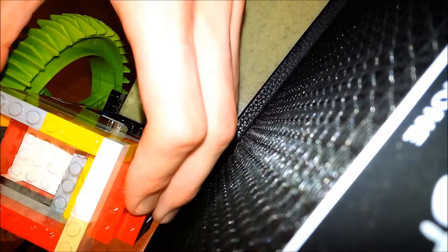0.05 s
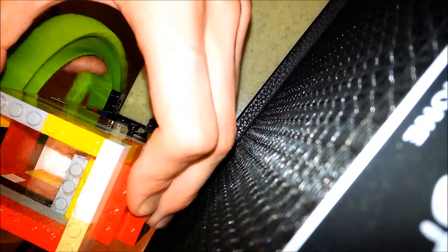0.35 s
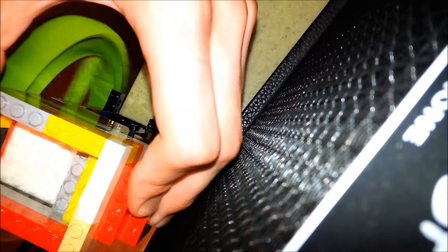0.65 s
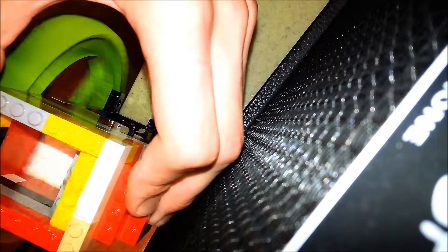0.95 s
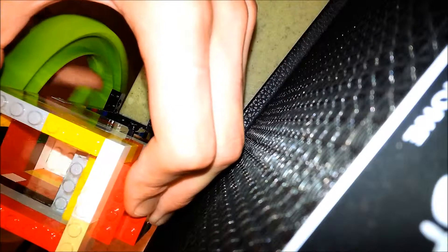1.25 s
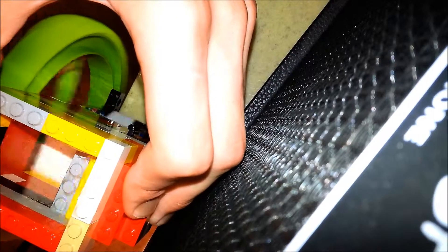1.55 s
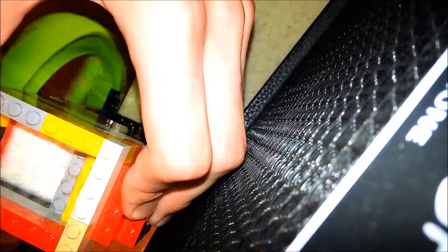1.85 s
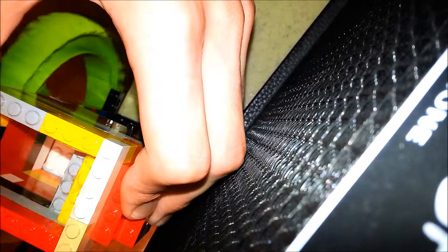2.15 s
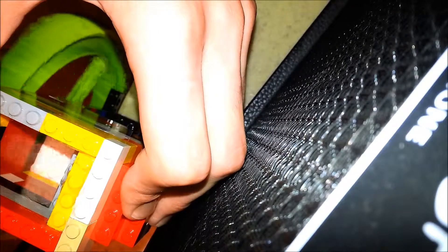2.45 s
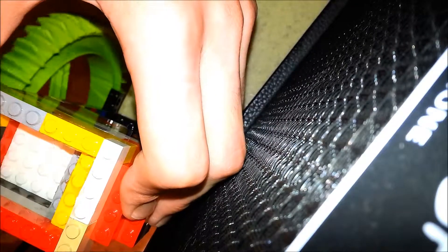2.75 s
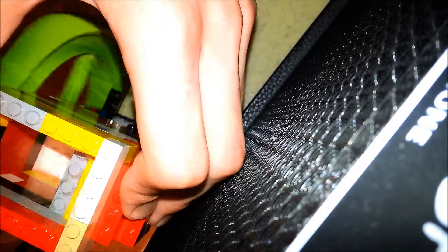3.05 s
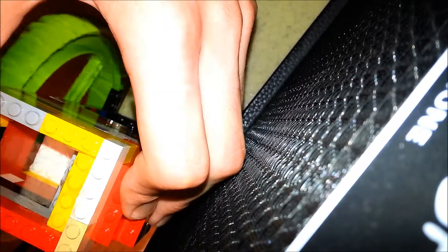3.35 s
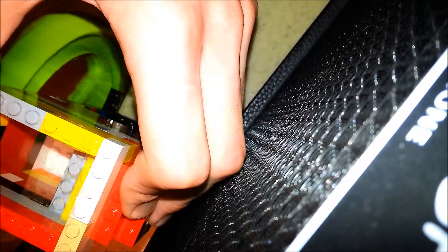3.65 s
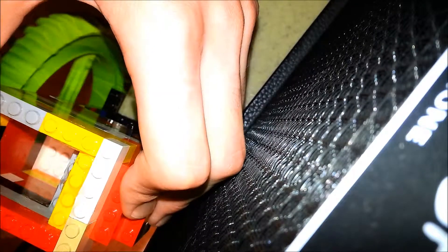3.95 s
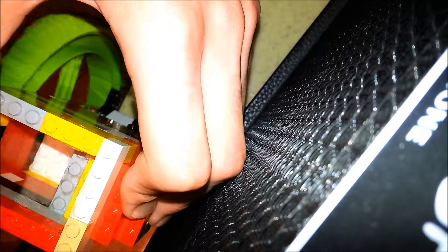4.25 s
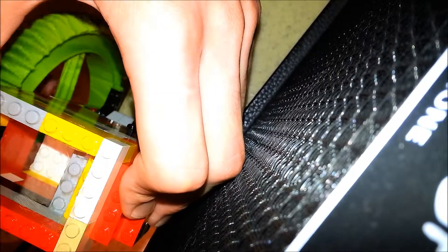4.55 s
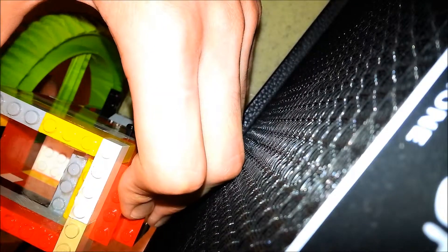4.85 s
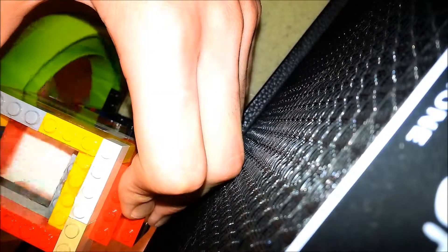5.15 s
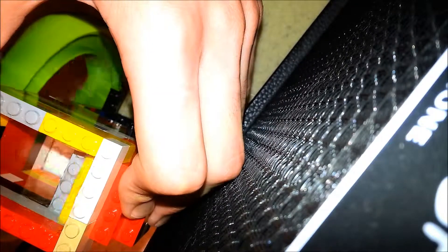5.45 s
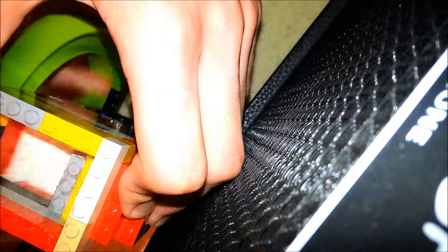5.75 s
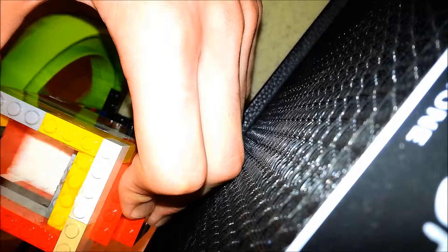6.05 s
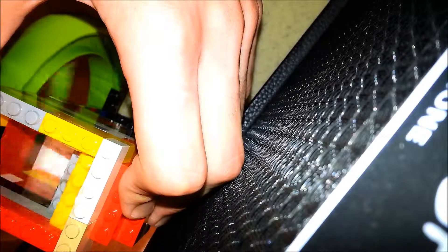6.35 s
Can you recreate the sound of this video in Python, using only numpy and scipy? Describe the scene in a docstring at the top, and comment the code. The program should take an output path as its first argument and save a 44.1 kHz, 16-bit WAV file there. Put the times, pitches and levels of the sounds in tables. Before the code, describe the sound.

A toy piston engine built of plastic bricks is turned by hand in a few uneven spins. Each stroke gives a sharp click and an immediate clack, with a slight hollow ring from the frame. Between strokes the parts rub, scrape and rattle softly. The clacking pauses twice and resumes. It is heard close up in a small, quiet room, with a faint electric buzz on the left.

```python
"""Toy piston engine

An engine of plastic bricks is turned by its wheel in a few spins, close up in a small room.
On each stroke the slack linkage clicks, the piston clacks home and the hollow frame drones.
Between strokes the parts rub, catch, rattle and bump; frame and room ring on.
A faint electric buzz sits in the left channel over quiet room air."""
import sys
import numpy as np
from scipy import signal
from scipy.fft import rfft, irfft, next_fast_len
from scipy.io import wavfile
from scipy.ndimage import uniform_filter1d, map_coordinates

SR = 44100
rng = np.random.default_rng(int(sys.argv[2]) if len(sys.argv) > 2 else 0)


def transcribe(signal):
    """Save signal, clipped to [-1, 1], as a 16-bit WAV file at the path in sys.argv[1]."""
    frames = np.atleast_2d(signal).T
    limited = np.clip(frames, -1, 1)
    pcm = np.round(limited * 32767).astype(np.int16)
    wavfile.write(sys.argv[1], SR, pcm)


N = 282681
TIME = np.arange(N) / SR
AGE = np.arange(SR // 2) / SR  # seconds since a blow
ATTACK, EARLY = 132, 1320  # samples in the first 3 ms and 30 ms of a hit
FRAME_PAN_DB = [[1], [-1]]  # the frame sounds a little to the left

# engine strokes: click t/s, click level/dB, its crack level/dB, clack t/s, clack level/dB, drone level/dB
STROKES = [(0.3954, -18.5, -42, 0.4546, -24.5, -39), (0.902, -13.5, -32.5, 0.9364, -16.5, -46),
           (1.3238, -11.5, -27, 1.3574, -13, -40), (1.6926, -16, -18, 1.7168, -15.5, -54),
           (2.0633, -20.5, -36.5, 2.1026, -24.5, -49), (3.1676, -16.5, -31.5, 3.1935, -12, -40),
           (3.7238, -15, -20.5, 3.7487, -12.5, -46), (4.1991, -15.5, -39, 4.2345, -27, -45),
           (4.3667, -20, -39.5, 4.4116, -28.5, -50.5), (5.5015, -14, -33, 5.5345, -12, -41),
           (5.953, -13.5, -36, 5.9894, -11, -39.5), (6.3655, -18, -41, 6.4033, -10.5, -41)]
# bright spectrum of cracks, grit and hiss: f/Hz, level/dB
BRIGHT = [(500, -44), (2500, 1.5), (4500, 2.5), (6000, 5.5), (8000, 4), (11000, -5), (14500, -9)]


def piston():
    """The piston grazes its guide and clacks home; the harder the knock, the brighter its crack."""
    # piston modes: f/Hz, level/dB, t60/s
    modes = [(430, -22, 0.019), (994, -5.5, 0.01), (1348, 2, 0.019), (1844, -6, 0.011),
             (3090, -12.5, 0.011), (3790, -19, 0.022)]
    crack_growth, graze_lead_s, graze_db = 1.45, 0.00119, -17.5
    clacks = [(s, db, crack_growth * db - 9.5, 1) for *_, s, db, _ in STROKES]
    out = blows(clacks, modes, contact_s=0.00057, tail_db=-14, frame_db=-9, wall_db=4, shade_db=-12.5)
    for s, db, _, _ in clacks:
        graze = direct(struck(modes, contact_s=0.00036), shade_db=-11.5)
        add(out, s - graze_lead_s, amp(db + graze_db) * graze)
    return out


def linkage():
    """The linkage takes up its slack at the start of each stroke, and rattles in between."""
    # linkage modes: f/Hz, level/dB, t60/s
    modes = [(455, -13.5, 0.017), (1026, -10.5, 0.017), (1583, 8.5, 0.013), (1833, 7.5, 0.013),
             (2180, 3, 0.0057), (3310, 1, 0.0066)]
    # rattles in the linkage's play: t/s, level/dB, crack level/dB, pitch factor
    rattles = [(0.7166, -31.5, -57, 1.03), (0.766, -31.5, -52, 1.02), (1.1375, -32.5, -56, 1.02),
               (1.1563, -28.5, -61, 1.12), (1.1801, -25.5, -55, 1.07), (1.5549, -28.5, -60, 1.08),
               (1.5792, -21.5, -32, 1.15), (1.9517, -18, -28, 1.125), (1.9678, -23.5, -37, 1.08),
               (2.7334, -29, -57, 0.95), (4.2641, -25.5, -58, 1.1), (4.6326, -32, -40, 1.03),
               (5.2963, -28.5, -44, 0.98), (5.3345, -22, -61, 1.006), (5.7739, -26, -43, 0.97),
               (5.82, -25.5, -53, 1.1), (6.2092, -26.5, -42.5, 1.02), (6.2492, -18, -40, 1.04)]
    clicks = [(s, db, crack_db, 1) for s, db, crack_db, *_ in STROKES]
    taut = blows(clicks, modes, contact_s=0.0005, tail_db=-12.5, frame_db=-12, wall_db=-1.5,
                 shade_db=-10.5)
    slack = blows(rattles, modes, contact_s=0.00048, tail_db=-11, frame_db=-10.5, wall_db=-3,
                  shade_db=-10)
    return taut + slack


def blows(hits, modes, contact_s, tail_db, frame_db, wall_db, shade_db):
    """Each hit cracks and rings its part briefly, then the frame and the room in proportion."""
    # long modes of the hollow frame and the space round it: f/Hz, level/dB, t60/s
    frame_modes = [(327, -7, .35), (1343, 2, .24), (1585, -4, .2), (1780, -5, .2), (1915, -3, .2),
                   (2929, -11, .25), (3373, -5, .25), (3553, -9, .2), (3680, -6, .2)]
    # colour of the room tail: f/Hz, level/dB
    room_colour = [(50, -46), (130, -11.5), (250, -5), (330, -2), (480, -1.5), (650, -8.5), (1000, -3),
                   (1350, 0.5), (1950, 0.5), (2500, -2.2), (3600, -3.5), (4600, -8.5), (6200, -23.5),
                   (14000, -52)]
    out = np.zeros((2, N))
    glint = unit_over(np.sin(2 * np.pi * 3500 * AGE) * AGE * np.exp(-AGE / 0.0004), ATTACK)
    for s, db, crack_db, pitch in hits:
        part = struck(np.multiply(modes, [pitch, 1, 1]), contact_s)
        add(out, s, amp(db) * direct(part, shade_db) + amp(crack_db) * crack(t60=0.0094))
        frame = np.array([ring(frame_modes, phase_spread=np.pi) for side in range(2)])
        frame = unit_over(frame * (1 - np.exp(-AGE / 0.0017)), EARLY) * amp(FRAME_PAN_DB)
        room = reflections(room_colour, build_s=0.002)
        add(out, s, amp(db + tail_db) * (amp(-6) * room + amp(frame_db) * frame))
        # a hard surface nearby throws the upper ring back to the left
        add(out[0], s + 0.0108, amp(db + tail_db + wall_db) * glint)
    return out


def struck(modes, contact_s):
    """A small part is hit; its pitch shifts with how it sits, and it radiates little bass."""
    seating = np.exp(0.03 * rng.standard_normal())
    motion = ring(np.multiply(modes, [seating, 1, 1])) * (1 - np.exp(-AGE / contact_s))
    return unit_over(filtered(motion, lambda hz: high_pass(hz, corner_hz=328, damping=1.24)), ATTACK)


def ring(modes, phase_spread=0):
    """Damped modes, at new strengths for each blow."""
    hz, db, t60 = np.transpose(modes)[..., None]
    strength, phase = rng.standard_normal((2, len(modes), 1))
    envelopes = amp(db + 2 * strength - 60 * AGE / t60)
    return np.sum(envelopes * np.sin(2 * np.pi * hz * AGE + phase_spread * phase), 0)


def crack(t60):
    """The bright instant of contact between hard edges, and its splash in the room."""
    # colour of the splash: f/Hz, level/dB
    splash_colour = [(500, -16), (2500, 1.5), (3500, 2.5), (4700, 4.5), (6200, -6), (8500, -5),
                     (11000, -14.5), (14500, -20)]
    burst = coloured(rng.standard_normal(len(AGE)), BRIGHT)[0] * amp(-60 * AGE / t60)
    splash = reflections(splash_colour, build_s=0.0059)
    splash *= amp(-5) + np.exp(-AGE / 0.0065)  # near walls answer first
    return direct(unit_over(burst, ATTACK), shade_db=-15) + amp(-9.5) * splash


def bumps():
    """Soft, dull contacts of parts that sit loosely."""
    # bumps: t/s, level/dB
    hits = [(0.511, -32), (0.6019, -31.5), (1.0589, -25), (1.471, -30), (1.855, -29), (2.7337, -37),
            (3.3115, -28.5), (4.6323, -35), (4.742, -40), (5.061, -37.5), (5.137, -40), (5.172, -33),
            (5.674, -30.5), (6.0962, -28)]
    # modes of the loose parts: f/Hz, level/dB, t60/s
    modes = [(317, -15, 0.076), (830, -2, 0.033), (1037, 7, 0.018), (1200, 2.5, 0.034)]
    # colour of their room tail: f/Hz, level/dB
    dull_colour = [(100, -19), (330, 2), (600, -13), (1050, 2), (1500, -9), (2500, -10.5), (6000, -26.5)]
    out = np.zeros((2, N))
    for s, db in hits:
        knock = direct(struck(modes, contact_s=0.00061), shade_db=-7.5)
        add(out, s, amp(db) * (knock + amp(-14) * reflections(dull_colour, build_s=0.0022)))
    return out


def snaps():
    """Brick edges snap past each other: tiny, bright ticks with no body."""
    # ticks: t/s, level/dB
    ticks = [(0.979, -38), (1.167, -38), (1.2897, -38.5), (1.3032, -36), (2.1589, -38), (3.1, -40),
             (3.632, -28), (3.644, -29), (4.705, -36), (5.4, -50), (5.6042, -22.5), (6.0522, -31.5)]
    out = np.zeros((2, N))
    for s, db in ticks:
        add(out, s, amp(db) * crack(t60=0.0011))
    return out


def friction():
    """How hard the parts rub, in dB: steadily through each spin, harder where the piston binds."""
    # the hand keeps the wheel going: start/s, length/s, level/dB
    spins = [(0.34, 0.55, -50.5), (0.84, 0.59, -46.5), (1.44, 0.72, -43.5), (3.05, 0.33, -48),
             (3.55, 0.28, -44), (4.14, 0.29, -48), (5.24, 1.62, -48)]
    # the piston scrapes along its guide: start/s, length/s, level/dB
    scrapes = [(0.685, 0.052, -39), (1.107, 0.033, -39.5), (1.485, 0.05, -36), (1.787, 0.017, -33.5),
               (1.89, 0.069, -38), (2.6, 0.05, -48.5), (2.983, 0.012, -39.5), (3.082, .06, -33.5),
               (3.462, .016, -42), (3.567, 0.02, -30.5), (3.598, 0.054, -26.5), (4.082, 0.015, -45.5),
               (4.176, .015, -42), (4.208, 0.029, -29.5), (4.629, 0.011, -34), (4.858, 0.012, -42.5),
               (5.297, 0.04, -39), (5.603, 0.022, -39), (5.815, 0.042, -33), (6.21, 0.066, -39)]
    creep_db = -65.5  # between spins the parts barely rub
    spin_db = together(swells(spins, rise_s=0.015, fall_db_per_s=230), creep_db)
    return together(spin_db, swells(scrapes, rise_s=0.0086, fall_db_per_s=227))


def rubbing(friction_db):
    """Piston and axle slide on dry plastic, scratching brighter the harder they bind."""
    # colour of sliding plastic: f/Hz, level/dB
    slide_colour = [(100, -30), (330, -12), (650, -1.5), (1100, 3.5), (1500, 4), (2000, 0.5), (2700, -4),
                    (3800, 0.7), (5000, -8), (6500, -23), (14000, -26.5)]
    rub_db = friction_db + 1.1 * wobble(30)
    rub = coloured(slips(per_s=160, spread_db=6, wash=0.82), slide_colour, lean=0.65)
    rub = wandering(rub, depth_db=3.3)
    grit = coloured(slips(per_s=300, spread_db=8, wash=1.2), BRIGHT)
    return amp(rub_db - 2.5) * rub + amp(1.166 * rub_db - 13.5) * grit


def slips(per_s, spread_db, wash):
    """Stick-slip: random little jerks of uneven size, over a noise wash for their echoes."""
    sizes = np.sign(rng.standard_normal(N)) * amp(spread_db * rng.uniform(-1, 1, N))
    jerks = (rng.random(N) < per_s / SR) * sizes
    return unit(direct(jerks, shade_db=-11)) + wash * rng.standard_normal((2, N))


def wandering(x, depth_db):
    """The contact point moves, so short-lived resonances come and go."""
    spectra = signal.stft(x, nperseg=512)[2]
    patches = uniform_filter1d(rng.standard_normal(spectra.shape[1:]), size=5, axis=0)
    patches = unit(uniform_filter1d(patches, size=5, axis=1))
    return unit(signal.istft(spectra * amp(depth_db * patches), nperseg=512)[1][:, :N])


def drone(friction_db):
    """Friction and the load of each stroke shake the hollow frame at its low resonances."""
    # low frame resonances: f/Hz, width/Hz, level/dB
    resonances = [(178, 51, -15), (324.4, 11.7, 1.5), (418, 39, -8)]
    lead_s, length_s, rest_db = 0.045, 0.14, -57  # the load comes on just before the click
    loads = [(s - lead_s, length_s, db) for s, *_, db in STROKES]
    rub_db = together(friction_db - 11.5, rest_db)
    drone_db = together(swells(loads, rise_s=0.069, fall_db_per_s=89), rub_db)

    def body(f):
        return sum(amp(db) * 1j * f * width / (hz ** 2 - f ** 2 + 1j * f * width)
                   for hz, width, db in resonances)

    centre, sides = rng.standard_normal(N), rng.standard_normal((2, N))
    return amp(drone_db) * unit(filtered(centre + 1.13 * sides, body)) * amp(FRAME_PAN_DB)


def brushing():
    """The finger that drives the wheel slides off its ribbed tyre with a thin hiss."""
    # finger brushes: start/s, length/s, level/dB
    brushes = [(0.495, 0.033, -55.5), (0.825, 0.032, -57), (1.23, .04, -54), (1.485, .025, -49)]
    level_db = swells(brushes, rise_s=0.011, fall_db_per_s=160)
    return amp(level_db) * coloured(rng.standard_normal((2, N)), BRIGHT)


def axle_hoot(s, width_s, hz, db):
    """The axle sings softly for a moment as it creeps round."""
    envelope = amp(db) * np.exp(-((TIME - s) / width_s) ** 2)
    return envelope * np.sin(2 * np.pi * hz * TIME + 0.26 * wobble(20))


def direct(x, shade_db):
    """The toy faces the right microphone; the left one hears it later and shaded."""
    pair = np.array([np.zeros_like(x), x])
    add(pair[0], 17 / SR, amp(shade_db) * x)
    return pair


def reflections(colour, build_s):
    """A fresh stereo room tail that builds up, then dies away, lingering longest in the lows."""
    # room decay: f/Hz, t60/s
    decay = [(150, 0.45), (350, 0.47), (1300, 0.26), (4000, 0.21), (12000, 0.32)]
    noise = coloured(rng.standard_normal((2, len(AGE))), colour, lean=0.72)
    hz, t, spectra = signal.stft(noise, SR, nperseg=256)
    fade = amp(-60 * t / along(decay, hz)[:, None])
    tail = signal.istft(spectra * fade, SR, nperseg=256)[1][:, :len(AGE)]
    return unit_over(tail * (1 - np.exp(-AGE / build_s)), EARLY)


def buzz(rate_hz, pulse_s, low_hz, high_hz, db):
    """Electric pickup in the left channel: short square pulses, rounded by the input stage."""
    def input_stage(hz):
        return high_pass(hz, low_hz, damping=1.51) / (1 + 1j * hz / high_hz) / (1 + 1j * hz / 3000)

    cycle_s = (TIME - 0.0106) % (1 / rate_hz)
    pulses = np.clip((pulse_s - cycle_s) * SR, 0, 1) * amp(wobble(15) / 2)
    return amp(db) * np.array([filtered(pulses, input_stage), np.zeros(N)])


def air(db):
    """A low murmur of room air, with microphone hiss."""
    # room tone: f/Hz, level/dB
    air_colour = [(25, -21), (60, -11), (120, 0.5), (200, -0.5), (330, -1.5), (500, -11), (700, -11.0),
                  (1100, -14), (2000, -19), (4000, -19), (6000, -23.5), (9000, -21.5), (14000, -21.5)]
    return amp(db) * coloured(rng.standard_normal((2, N)), air_colour)


def coloured(x, colour, lean=0):
    """x given a spectrum, in stereo at rms 1; lean tips it left the way reflected sound arrives."""
    # balance of reflected sound: f/Hz, left minus right/dB
    leftward = [(100, 5), (220, 14.5), (400, 2), (700, 2.5), (1300, 4.5), (2400, 6.5), (3800, 17),
                (5000, 7.5), (8000, -1.5), (14000, 1)]

    def response(hz):
        return amp(along(colour, hz) + np.outer([0.5, -0.5], lean * along(leftward, hz)))

    return unit(filtered(x, response))


def swells(events, rise_s, fall_db_per_s):
    """Level in dB of (start/s, length/s, level/dB) events that each rise, hold and fall."""
    power = np.zeros(N)
    for s, length, db in events:
        onset = np.clip((TIME - s) / rise_s, 0, 1)
        fade_db = np.clip(fall_db_per_s * (TIME - s - length), 0, 100)
        power += (onset * amp(db - fade_db)) ** 2
    return 10 * np.log10(power + 1e-12)


def together(a_db, b_db):
    """Summed level in dB of two unrelated sounds."""
    return 10 * np.log10(amp(a_db) ** 2 + amp(b_db) ** 2)


def wobble(per_s):
    """A random curve that barely leaves its first knot, so it stays almost constant over the whole sound; per_s
    only sets how many knots are drawn."""
    return map_coordinates(rng.standard_normal(int(N * per_s / SR) + 4), [TIME * per_s / SR])


def filtered(x, response):
    """x through a filter given as a function of frequency."""
    n = x.shape[-1]
    padded = next_fast_len(n + 4096)
    return irfft(rfft(x, padded) * response(np.fft.rfftfreq(padded, 1 / SR)), padded)[..., :n]


def high_pass(hz, corner_hz, damping):
    """A causal two-pole high-pass response."""
    return -hz ** 2 / (corner_hz ** 2 - hz ** 2 + 1j * damping * corner_hz * hz)


def along(points, hz):
    """(f/Hz, value) points read on a log frequency axis."""
    freqs, values = np.transpose(points)
    return np.interp(np.log(hz + 1), np.log(freqs), values)


def add(out, s, x):
    """Mix x into out from time s."""
    part = out[..., max(round(s * SR), 0):][..., :x.shape[-1]]
    part += x[..., :part.shape[-1]]


def amp(db):
    """Decibels to gain."""
    return 10 ** (np.asarray(db) / 20)


def unit(x):
    """x scaled to rms 1."""
    return x / np.sqrt(np.mean(x ** 2) + 1e-20)


def unit_over(x, size):
    """x scaled to rms 1 over its first size samples."""
    return x / np.sqrt(np.mean(x[..., :size] ** 2) + 1e-20)


def scene():
    """The toy's knocks and sliding sounds over the buzz and the room air."""
    friction_db = friction()
    knocks = linkage() + piston() + bumps() + snaps()
    sliding = rubbing(friction_db) + brushing() + drone(friction_db)
    hoot = axle_hoot(s=2.93, width_s=0.053, hz=428, db=-47.5)
    bed = buzz(rate_hz=30.009, pulse_s=0.0014, low_hz=249, high_hz=1010, db=-27) + air(db=-52.5)
    return knocks + sliding + hoot + bed


def record(dry):
    """A steep low-pass cuts off the very top of the treble."""
    top_hz = 14700
    return filtered(dry, lambda hz: 1 / np.sqrt(1 + (hz / top_hz) ** 240))


dry = scene()
out = record(dry)
transcribe(out)
```